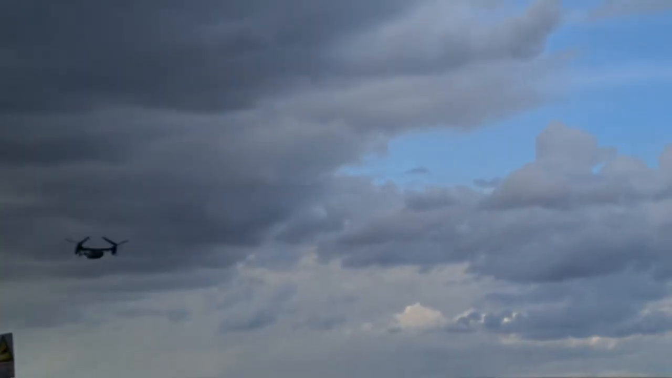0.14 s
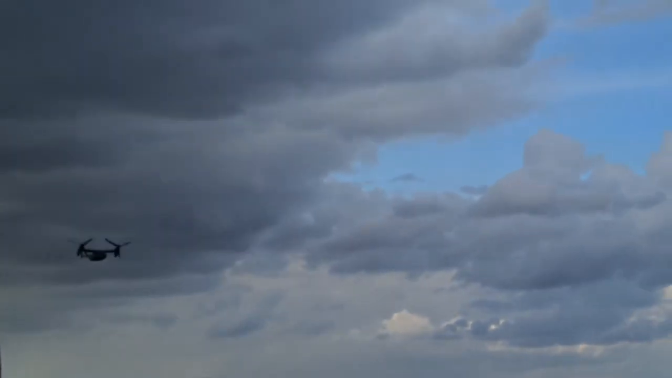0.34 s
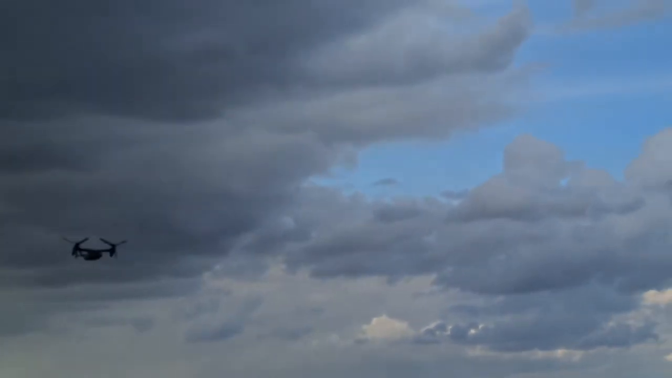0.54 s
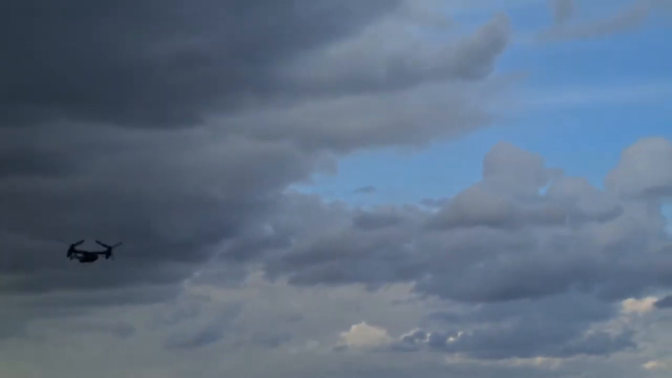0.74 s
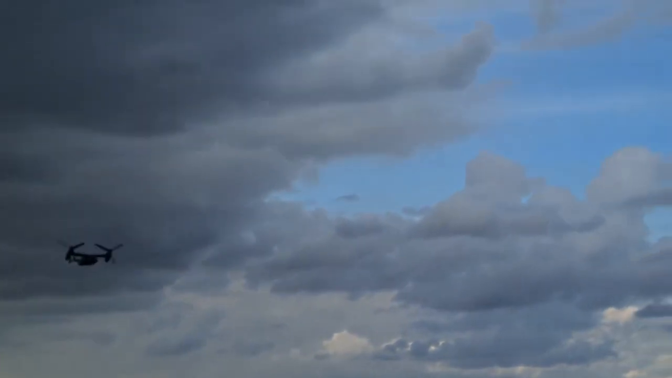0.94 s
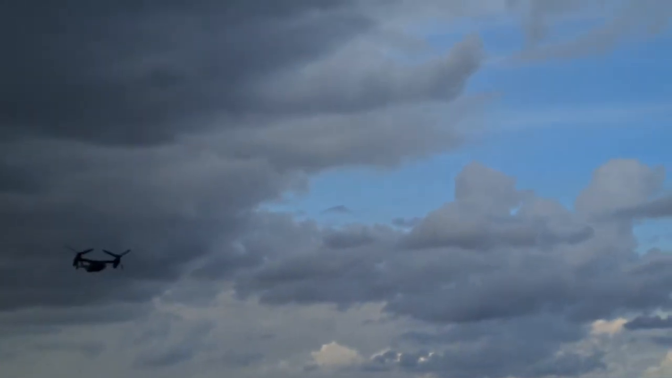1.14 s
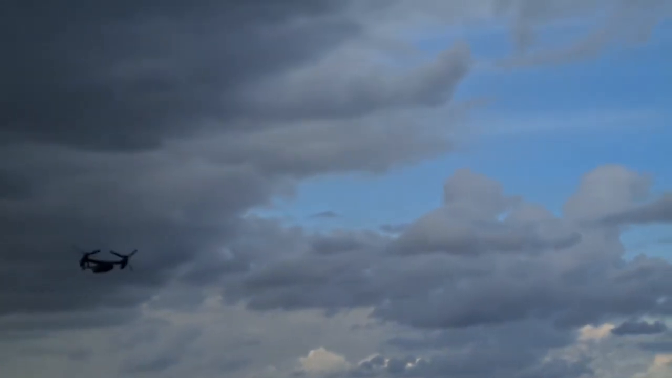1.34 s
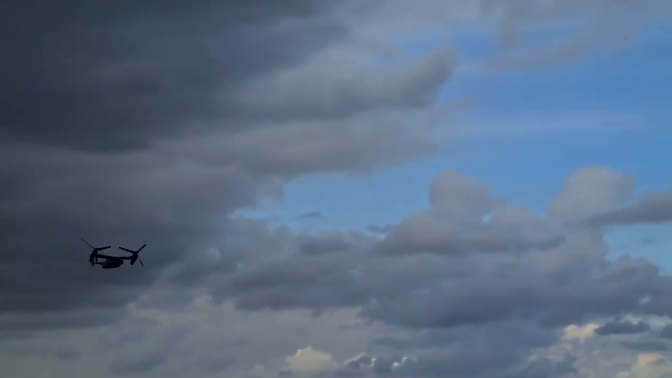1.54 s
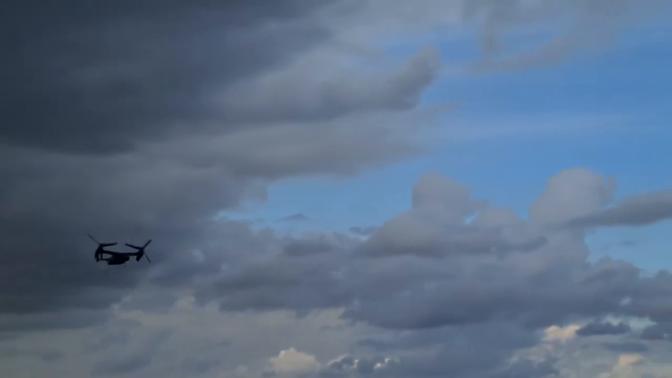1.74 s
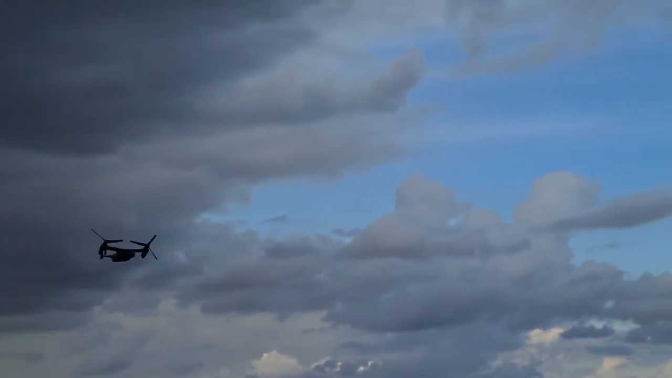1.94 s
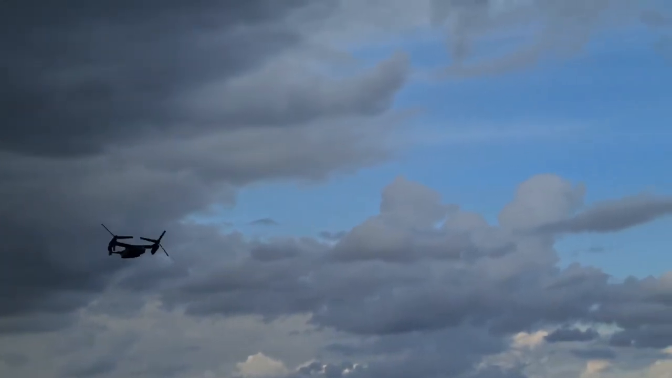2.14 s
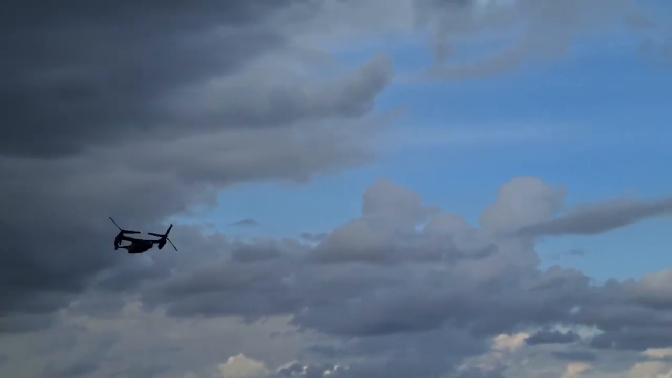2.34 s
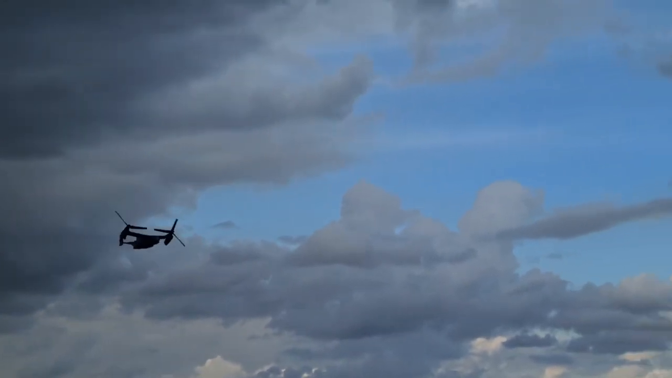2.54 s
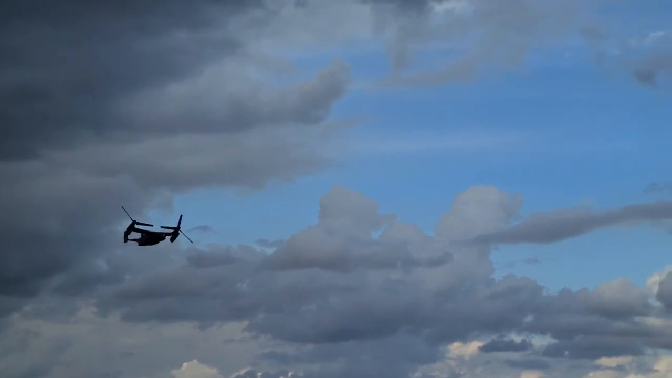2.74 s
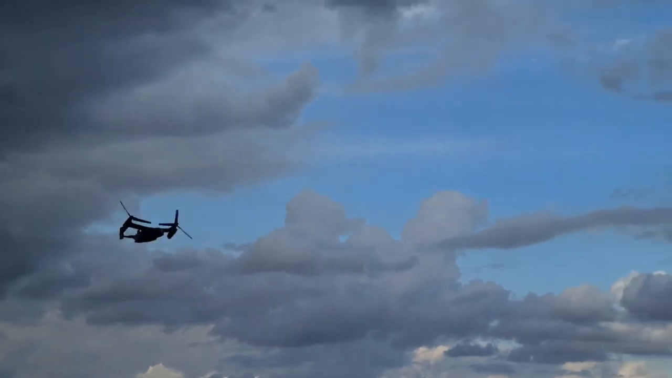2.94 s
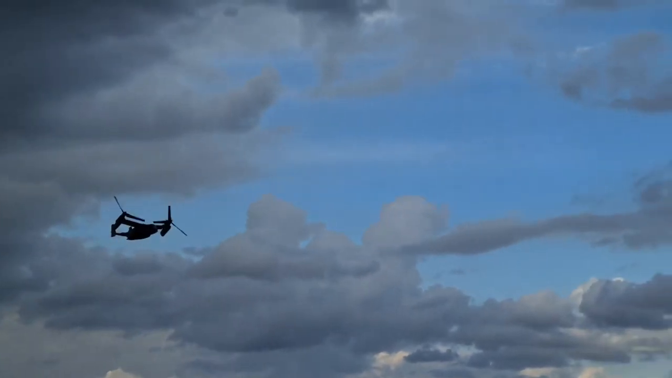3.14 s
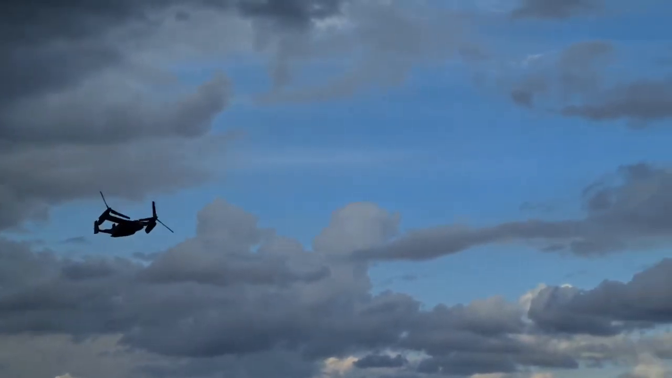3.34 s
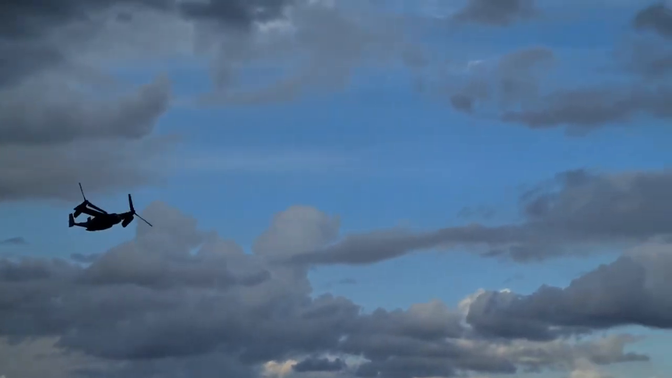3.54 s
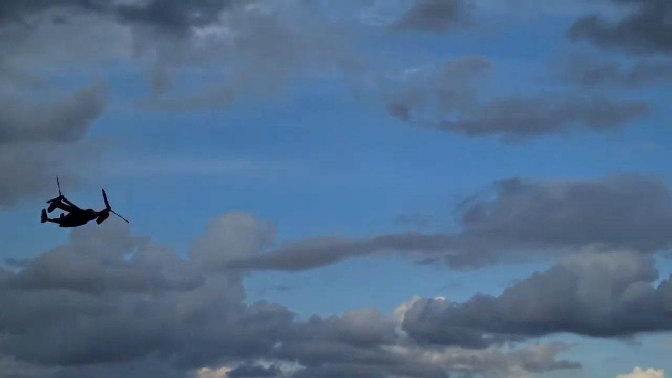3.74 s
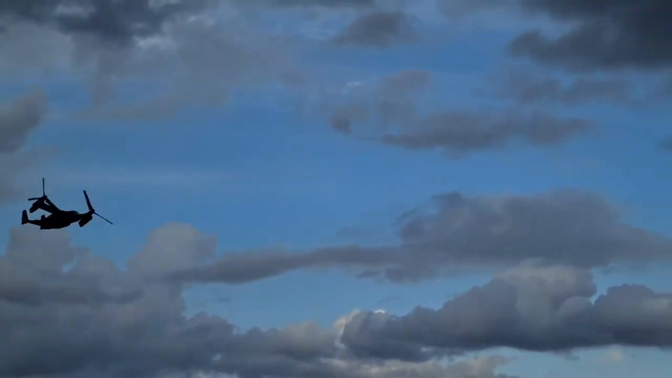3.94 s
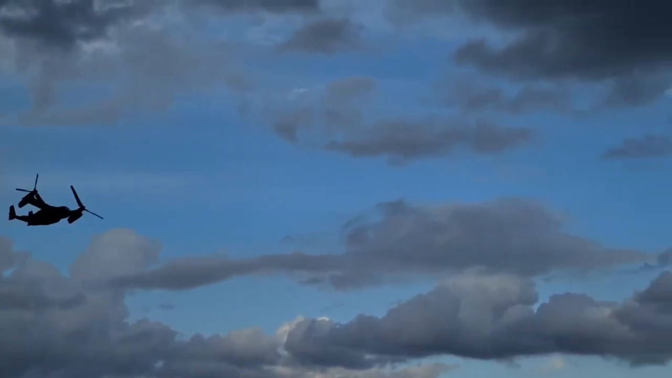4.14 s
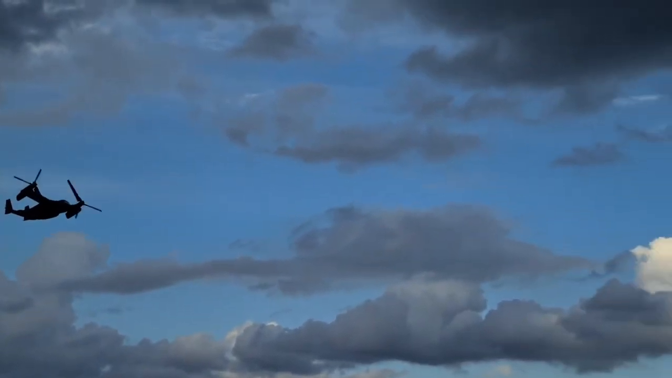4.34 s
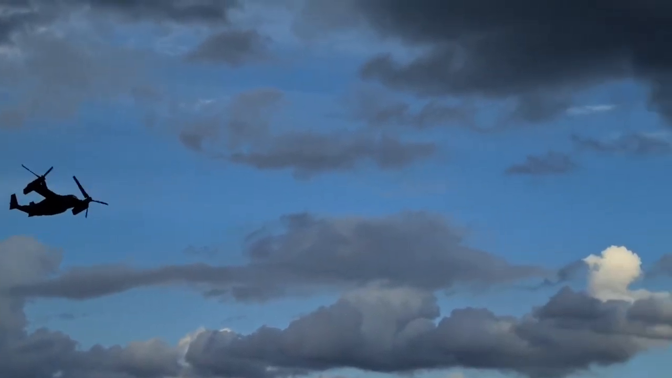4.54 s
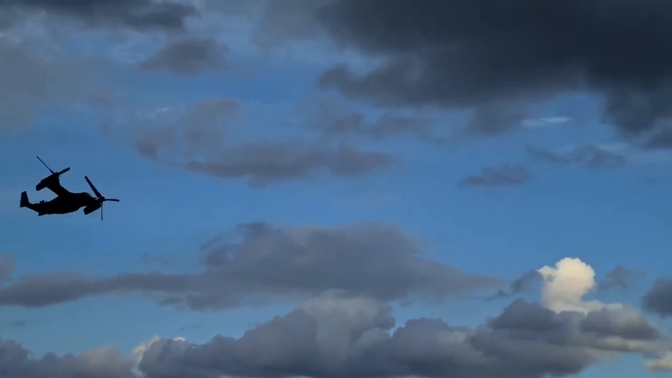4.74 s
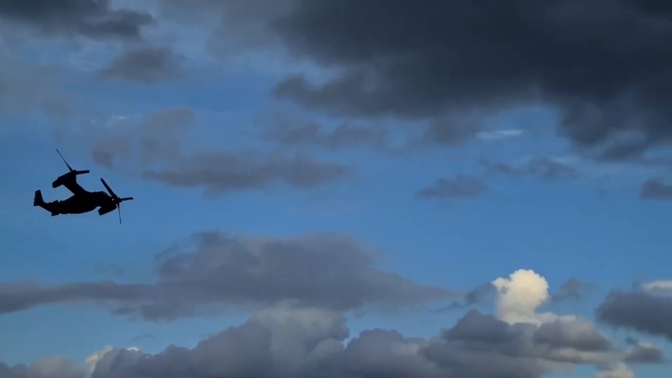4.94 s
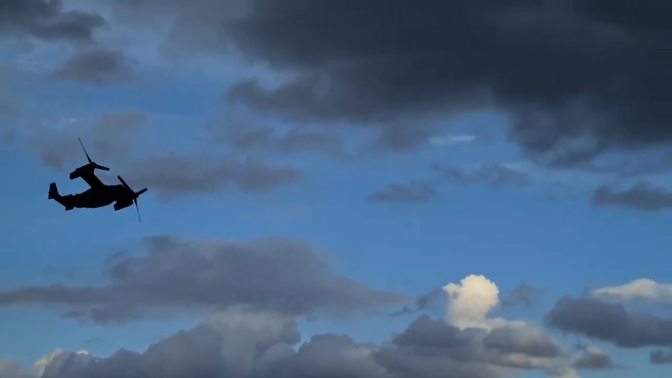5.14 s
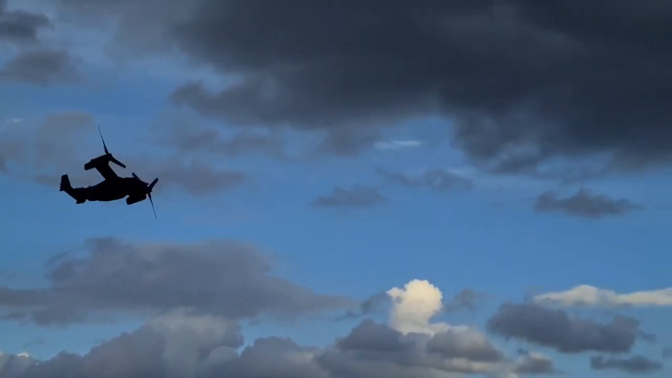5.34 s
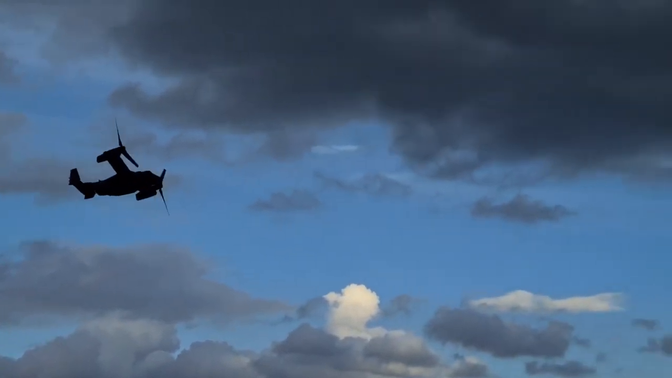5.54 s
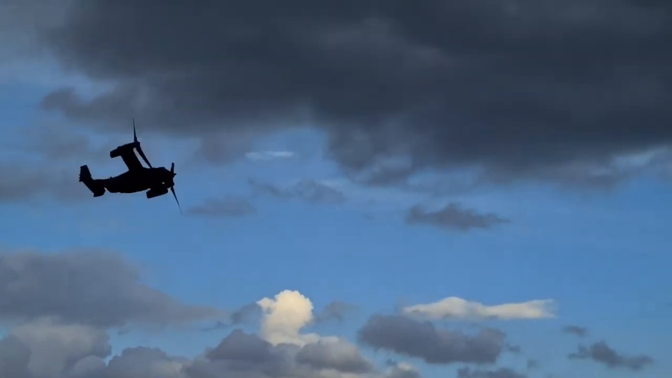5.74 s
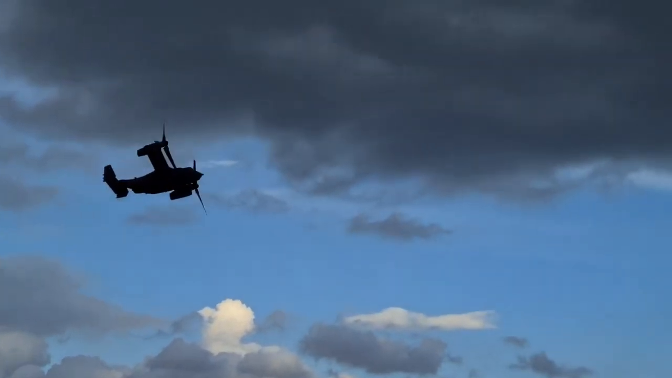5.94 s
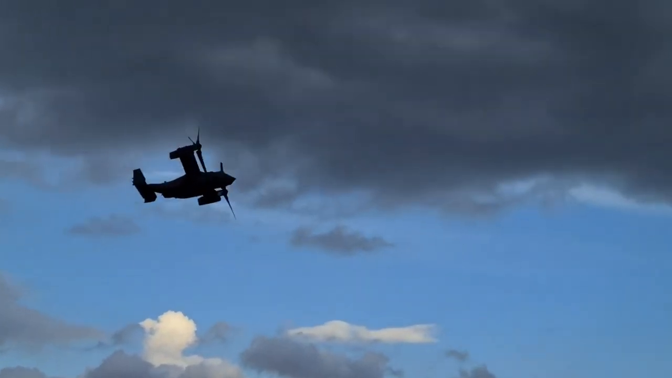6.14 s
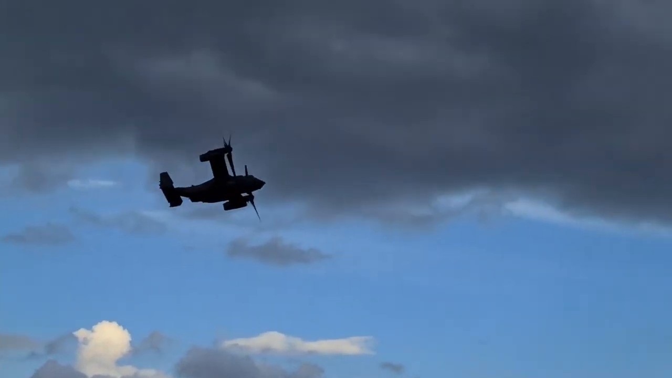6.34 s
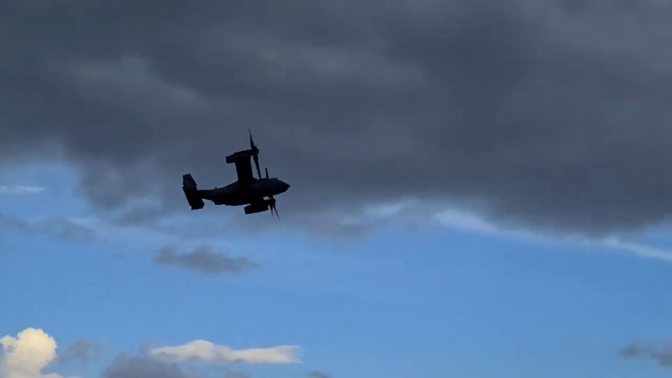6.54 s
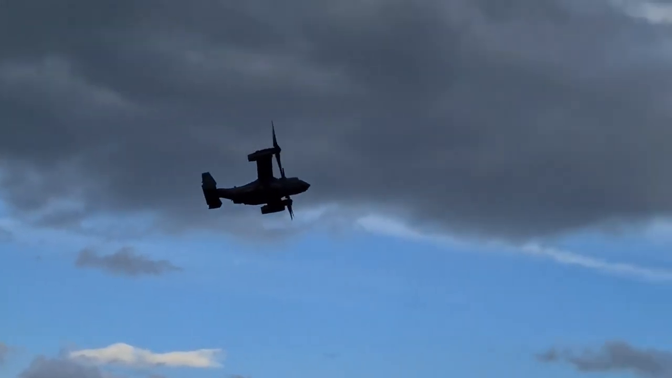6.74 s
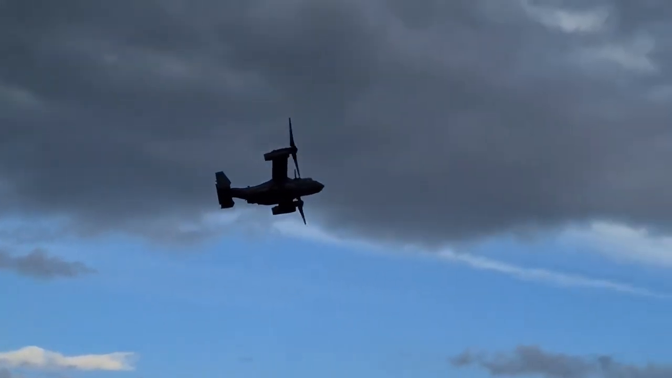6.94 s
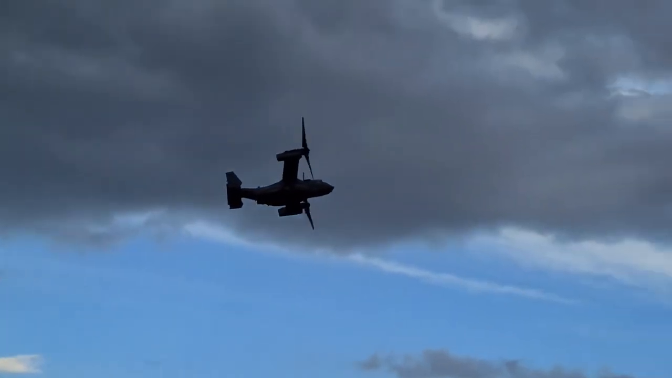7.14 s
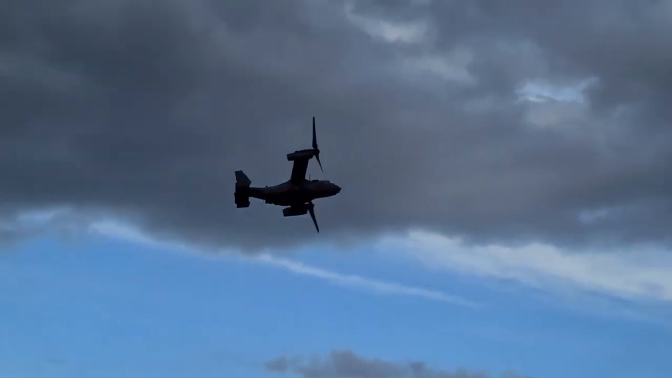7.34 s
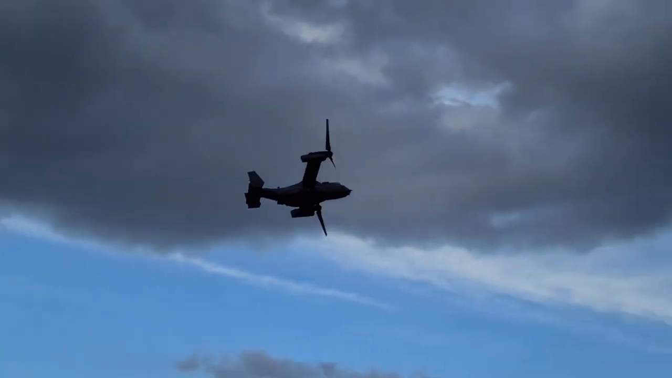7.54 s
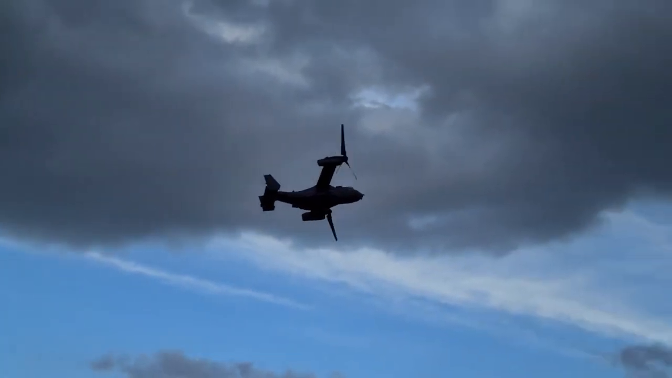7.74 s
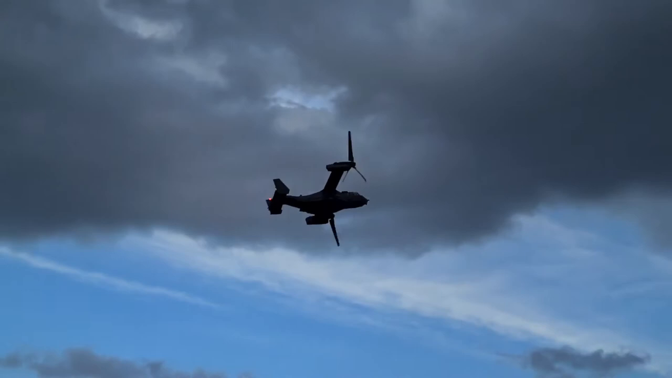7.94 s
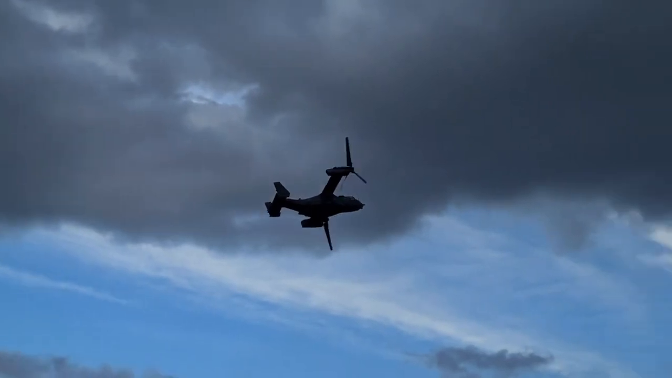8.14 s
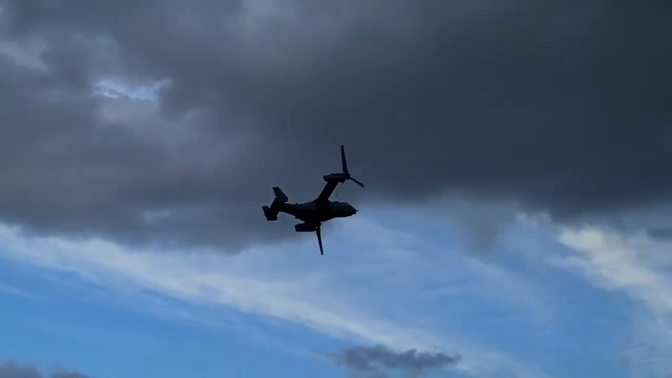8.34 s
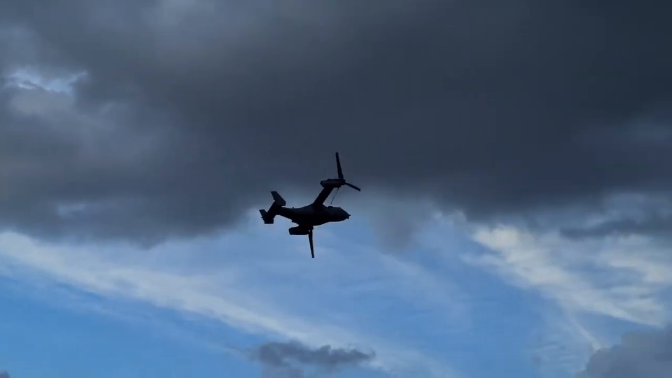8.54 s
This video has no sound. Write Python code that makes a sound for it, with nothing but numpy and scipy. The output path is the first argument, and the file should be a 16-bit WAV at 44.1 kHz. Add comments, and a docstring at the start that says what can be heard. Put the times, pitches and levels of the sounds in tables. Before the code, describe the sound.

A large tiltrotor flies in and draws level with a phone held at chest height in the open. Soft, blurred double thumps at roughly twenty-four per second pulse unevenly, then firm up. Turbine and blade noise swells into a broad, wavering rush with a treble swish on each beat. Near the end the beat falls in pitch and becomes a crisp chopping slap, still going at the cut.

```python
"""A twin-rotor aircraft approaches over an open airfield until it is abeam of a phone held at chest height.
A faint tone dies away at the start, and two small ticks fall in the first seconds, over hiss and low buffeting.
Each rotor radiates one low pressure pulse per blade; the spacing of the two trains slides as the wing turns.
Turbine and blade roar, shaped noise heard direct and by the ground, shimmers in the air and brightens.
The blade rate falls and the thump heard first of each pair sharpens to a slap as the aircraft comes abeam."""
import sys
import numpy as np
from scipy import signal
from scipy.fft import rfft, irfft, next_fast_len
from scipy.io import wavfile
from scipy.ndimage import uniform_filter1d

SR = 44100
rng = np.random.default_rng(int(sys.argv[2]) if len(sys.argv) > 2 else 0)


def master(y):
    """Save y as 16-bit WAV."""
    cut = np.clip(np.atleast_2d(y).T, -1, 1)
    pcm = np.round(cut * 32767)  # scale
    wavfile.write(sys.argv[1], SR, pcm.astype(np.int16))


N = 378378

# blade passes of the rotor heard first: (time [s], rate [Hz])
BLADE_RATE = [(0.0, 23.78), (0.6, 23.91), (1.2, 24.02), (1.8, 24.02), (2.4, 24.01), (3.0, 24.12),
              (3.6, 24.21), (4.2, 24.05), (4.8, 23.65), (5.4, 22.98), (6.0, 22.43), (6.5, 21.6),
              (7.0, 20.75), (7.5, 20.02), (8.0, 19.31), (8.58, 18.55)]
# bass level of the thumps, which the buffeting follows: (time [s], level [dB])
THUMP_LEVEL = [(0.0, -15.5), (0.38, -39), (0.6, -34), (0.69, -26), (0.95, -37), (1.24, -28), (1.27, -20.5),
               (1.48, -18), (1.58, -24.5), (2.53, -16.5), (2.65, -9.5), (2.67, -14), (3.23, -9.5),
               (4.18, -15.5), (4.54, -11), (6.79, -9.5), (7.22, -14), (7.38, -14), (8.03, -17), (8.2, -17),
               (8.24, -19), (8.58, -19)]
# roar; the air takes less treble as the path shortens:
# (time [s], level [dB], level of the top hiss relative to the roar [dB])
ROAR_LEVEL = [(0, -39, -36.5), (.3, -39.5, -31.5), (.8, -35.5, -30.5), (1.2, -31.5, -24), (1.5, -32, -28),
              (1.8, -28, -18), (2.2, -28.5, -21), (2.7, -26.5, -24), (3.2, -28, -22.5), (3.7, -31.5, -16.5),
              (4.4, -28.5, -15.5), (4.8, -27.5, -11.5), (5.3, -25, -13), (5.9, -25, -14.5), (6.4, -23, -16),
              (6.8, -25, -15), (7.6, -23.5, -15.5), (8, -22.5, -15.5), (8.3, -22, -18), (8.58, -24, -19.5)]
HEAD_ON_HZ, ABEAM_HZ = 24.05, 18.55  # blade rates that mark the two ends of the passage


def rotors(turns, hz):
    """Periodic loading noise: two trains of blade pulses, the second trailing, both sharpening abeam."""
    # lag of the rotor heard second as the wing turns: (time [s], lag [blade periods])
    lag_curve = [(0, 0.37), (1.1, 0.26), (1.3, 0.045), (2.3, 0.064), (3.2, 0.03), (4, 0.16), (4.9, 0.35),
                 (5.7, 0.49), (6.2, 0.54), (8.58, 0.45)]
    # standard deviation of the bell-shaped pulse heard first: (time [s], width [ms])
    first_width = [(0, 2.5), (.9, 2.1), (1.3, 1.6), (2, 2.5), (3, 1.9), (4, 1.5), (5, 1.82), (6, 1.28),
                   (7, .8), (8, 0.57), (8.58, .46)]
    # extra path by the ground: (time [s], rotor heard second [ms], rotor heard first [ms])
    extra_path = [(0, 2.7, 2.2), (2, 1.6, 3.2), (3.5, 2.7, 2.9), (5, 2.7, 3.07), (6.6, 2.54, 3.1),
                  (7.8, 2.76, 3.45), (8.58, 3.1, 3.43)]
    second_head_on_db, second_change_db = 2.5, -20  # the second fades abeam, behind the fuselage
    second_head_on_ms, second_abeam_ms = 2.18, 0.79  # standard deviation of the pulse heard second

    # uneven air shifts each arrival a little
    shifted_turns = turns + 0.0023 * walk(30)
    lag = curves(lag_curve)[0] + 0.004 * walk(22)
    first = bumps(shifted_turns, hz, curves(first_width)[0], scatter_db=2.0)
    second_width_ms = second_head_on_ms * (second_abeam_ms / second_head_on_ms) ** abeam()
    second = bumps(shifted_turns - lag, hz, second_width_ms, scatter_db=1.2)
    second = second * undb(second_head_on_db + second_change_db * abeam() ** 2.7)

    # each train has its own path by the ground
    second_ms, first_ms = curves(extra_path)
    pair = ground(first, first_ms, gain=0.76, dull_hz=600.0)
    pair = pair + ground(second, second_ms, gain=0.44, dull_hz=930.0)
    # a dull echo from something broad a few metres off
    pair = pair + .45 * butter(delay(pair, 13.2), 40., "low", order=1)
    # the capsule passes only the change of pressure: each pulse swings back under
    resonance = signal.iirpeak(40., .8, fs=SR)[1]
    pair = signal.lfilter([1, -2, 1], resonance, pair)

    bass = butter(pair, 130., "low", order=2)
    bass_rms = np.sqrt(uniform_filter1d(bass ** 2, SR // 4) + 1e-9)
    return pair / bass_rms * undb(curves(THUMP_LEVEL)[0])


def bumps(turns, hz, width_ms, scatter_db):
    """Blade-passing pulses: a bell-shaped pressure rise at each whole turn, varied in size."""
    whole = np.round(turns)
    sizes = undb(scatter_db * rng.standard_normal(N // 1000))
    offset_ms = (turns - whole) / hz * 1000
    return sizes[whole.astype(int) + 1] * np.exp(-.5 * (offset_ms / width_ms) ** 2)


def roar(turns, chop):
    """Broadband turbulence noise in half-octave steps, modulated by moving air and, in the treble, by the blades.
    Rows: the direct sound, then the scattered sound at either port."""
    # spectral density of the roar, relative: (frequency [Hz], density [dB per Hz])
    colour_curve = [(88, -44), (150, -12), (184, -9), (258, -2.5), (320, -7), (430, -2.5), (560, 2.5),
                    (630, -4), (700, -13.5), (873, -9), (1050, -13.5), (1310, -12.5), (1720, -13),
                    (2300, -19), (3560, -26.5), (4600, -27), (5920, -32.5), (7640, -42), (8600, -50),
                    (11200, -92), (18900, -120)]
    # how bands move: (frequency [Hz], offset [dB], share of the change in the hiss [ratio], gain abeam [dB])
    clearing = [(246, 1.5, 0.34, 3), (437, -1, -0.19, -7), (850, -3.5, -0.37, 3), (1460, -1, 0.088, -3),
                (2800, -1, -0.093, -0.5), (6160, -1.5, 0.75, 2.8)]
    # surges in the middle of the roar: (time [s], level [dB])
    surges = [(0, 0), (.9, 0), (1.5, -1), (1.9, 2), (2.35, 0.5), (3, 1.5), (3.5, 0), (4.2, 1.5),
              (5.5, -1.5), (6.1, -0.5), (7.2, 0), (7.7, -0.5), (8.3, 2.5), (8.58, 1.5)]
    surge_hz, surge_octaves = 1800, .7  # centre and standard deviation of the surges
    hiss_reference_db, swells_per_s = -15, 32

    roar_db, hiss_db = curves(ROAR_LEVEL)
    surge_db = curves(surges)[0]
    at_hz, *columns = np.transpose(clearing)
    side_on = abeam()

    size = next_fast_len(N)
    f = np.fft.rfftfreq(size, 1 / SR) + 1e-9
    colour_hz, colour_db = np.transpose(colour_curve)
    noise = rfft(rng.standard_normal((3, size))) * undb(np.interp(np.log(f), np.log(colour_hz), colour_db))
    # the band round 850 Hz sets the reference level
    middle = noise[:, (f > 620) & (f < 1150)]
    noise = noise / np.sqrt(2 / 3 * np.sum(np.abs(middle) ** 2)) * size

    swish = chop * undb(2.1 * walk(12)) * np.cos(2 * np.pi * (turns - .52))
    swell = walk(swells_per_s)  # common to all bands
    out = 0
    for step in range(-3, 10):
        hz = 350 * 2 ** (step / 2)
        place = np.log2(f / 350) * 2 - step
        # cosine-squared crossfade between neighbouring bands
        band = irfft(noise * np.cos(np.pi / 2 * np.clip(place, -1, 1)) ** 2, size)[:, :N]
        offset, follow, gain = (np.interp(np.log(hz), np.log(at_hz), c) for c in columns)
        moves = roar_db + offset + follow * (hiss_db - hiss_reference_db) + gain * side_on
        moves = moves + surge_db * np.exp(-.5 * (np.log2(hz / surge_hz) / surge_octaves) ** 2)
        high = np.clip(np.log2(hz / 1500) / 10.3, 0, 1)  # 0 up to 1500 Hz
        shimmer = (.4 + 1.1 * high) * swell + (.9 + .6 * high) * walk(30)
        out = out + band * undb(moves + shimmer) * np.exp(swish * high ** 0.75)
    return out


def tips(turns):
    """Trailing-edge noise: a resonant swish about half a period after each thump heard first, some much louder.
    Rows: the direct sound, then the scattered sound at either port."""
    head_on_db, gain_abeam_db = -13.5, 16  # relative to the top hiss; added abeam
    late_turns = turns - .55 + .05 * walk(40)
    puffs = .25 + bumps(late_turns, curves(BLADE_RATE)[0], width_ms=8, scatter_db=3.5)
    hiss = rng.standard_normal((3, N))
    for _ in range(2):
        hiss = ring(hiss, 7250.0, 1400.0)
    return unit(puffs * hiss) * undb(sum(curves(ROAR_LEVEL)) + head_on_db + gain_abeam_db * abeam())


def whine():
    """Narrow-band noise: one resonance makes a faint, soft tone that dies away at the start."""
    level_db, ends_s, fade_s = -58.5, 0.42, .1
    gate = np.clip((ends_s - np.arange(N) / SR) / fade_s, 0, 1)
    return unit(ring(rng.standard_normal(N), 4740., 35.)) * undb(level_db) * gate


def buffet():
    """Turbulent pressure: downwash and wind shake the ports with a low, uneven rumble that follows the thumps.
    Rows: the shared shake, then that of each port alone."""
    # rumble: (time [s], level relative to the thumps [dB])
    rumble = [(0, -6), (1.2, -5.5), (3, -14.5), (4.2, -12.5), (7, -17), (8.58, -13)]
    low = butter(rng.standard_normal((3, N)), [28, 140], "band", order=2)
    return unit(low) * undb(curves(THUMP_LEVEL)[0] + curves(rumble)[0])


def microphone():
    """Self-noise: faint high-passed hiss, with small dry noise ticks of sudden onset and exponential decay."""
    # hiss before its high-pass: (time [s], level [dB])
    hiss_floor = [(0, -68), (1.5, -75), (4, -76), (5.5, -77.5), (8.58, -83)]
    # ticks before their high-pass: (time [s], noise level at onset [dB])
    tick_list = [(0.3456, -57), (1.3613, -51)]
    decay_ms = 1.5  # time constant
    t = np.arange(N) / SR
    gate = sum(undb(db) * np.exp(-np.abs(t - s) * 1000 / decay_ms) * (t >= s) for s, db in tick_list)
    ticks = gate * rng.standard_normal(N)
    hiss = undb(curves(hiss_floor)[0]) * rng.standard_normal((2, N))
    return butter(hiss + ticks, 3000., "high", order=1)


def ground(x, ms, gain, dull_hz):
    """Ground reflection: the field returns a duller, later copy, whose lag wanders in moving air."""
    wander_ms = .015
    return x + gain * butter(delay(x, ms + wander_ms * walk(3.2)), dull_hz, "low", order=1)


def reflect(pair):
    """Comb filtering: a ground copy and an earlier one interfere with the roar at each port."""
    # copy by the ground: (time [s], extra path [ms], gain [ratio], wander in the long, uneven air [ms])
    ground_copy = [(0, 2.07, .18, .1), (2.2, 2.1, .35, .09), (3.3, 2.11, .22, .05), (3.8, 2.15, .5, .02),
                   (5.2, 2.31, .5, .025), (6.5, 2.46, .65, .02), (7.5, 2.56, .68, .02),
                   (8.58, 2.66, .72, .02)]
    # earlier reflection: (time [s], extra path [ms], gain [ratio])
    early_copy = [(0, 0.91, 0.16), (2.6, 1.04, 0.19), (3.2, 1.16, 0.15), (4, 1.71, 0.18), (5.1, 1.58, 0.12),
                  (5.8, 0.97, 0.16), (8.58, 0.91, 0.055)]
    skew_ms = 0.042  # the ground copy is this much later at the left port, earlier at the right
    ms, gain, wander_ms = curves(ground_copy)
    early_ms, early_gain = curves(early_copy)
    ms = ms + wander_ms * walk(5)
    copies = []
    for x, side in zip(pair, (1, -1)):
        from_ground = gain * delay(x, ms + side * skew_ms)
        copies.append(from_ground + early_gain * delay(x, early_ms))
    return pair + butter(np.array(copies), 2500, "low", order=2)


def ports(common, left_only, right_only):
    """Diffraction and coherence: the phone body delays and shades sound differently at its two ports."""
    # shading: (frequency [Hz], left minus right [dB])
    balance = [(40, -1.5), (200, -1), (506, -1), (900, -2), (1100, -3), (1500, -2.5), (2060, -2.5),
               (2800, 2), (4000, -2), (5750, -10.5), (6050, -4.5), (7340, -2), (9190, 1.5)]
    # phase: (frequency [Hz], lead of the left port [rad])
    phase_lead = [(0, 0), (350, .3), (700, .55), (950, .75), (1250, 1.6), (1700, 2.1), (2300, 1.7),
                  (3000, 2.4), (3900, 2.3), (4500, 2.8), (5300, 3.9), (6000, 5.5), (7300, 6.4), (8050, 8.8),
                  (9000, 10)]
    # coherence: (frequency [Hz], share of power in common [0-1])
    common_share = [(0, 1), (200, .96), (500, .99), (1000, .95), (2000, .88), (4000, .78), (6000, .72),
                    (9000, .62)]
    size = next_fast_len(N)
    f = np.fft.rfftfreq(size, 1 / SR)
    balance_db, lead, share = (np.interp(f, *np.transpose(c)) for c in (balance, phase_lead, common_share))
    out = []
    for side, own in ((1, left_only), (-1, right_only)):
        mix = np.sqrt(share) * rfft(common, size) + np.sqrt(1 - share) * rfft(own, size)
        shaded = mix * undb(side * balance_db / 2) * np.exp(.5j * side * lead)
        out.append(irfft(shaded, size)[:N])
    return np.array(out)


def abeam():
    """Doppler shift as a guide to position: the fall in blade rate runs from 0 head-on to 1 side-on."""
    return np.clip((HEAD_ON_HZ - curves(BLADE_RATE)[0]) / (HEAD_ON_HZ - ABEAM_HZ), 0, 1)


def walk(rate):
    """Slow random modulation: levels held 1 / rate s and smoothed twice; spread near 1."""
    k = int(SR / rate)
    held = np.repeat(rng.standard_normal(N // k + 1), k)
    return 1.96 * uniform_filter1d(uniform_filter1d(held, k), k)[:N]


def delay(x, ms):
    """Propagation delay, fixed or varying, by interpolation between samples."""
    return np.interp(np.arange(N) - ms * SR / 1000, np.arange(N), x)


def ring(x, hz, width_hz):
    """Simple resonance of given bandwidth, gain 1 at the centre."""
    return signal.lfilter(*signal.iirpeak(hz, hz / width_hz, fs=SR), x)


def butter(x, hz, kind, order):
    """Maximally flat filtering."""
    return signal.sosfilt(signal.butter(order, hz, kind, fs=SR, output="sos"), x)


def curves(table):
    """Linear interpolation of a table's columns over time, at the sample rate."""
    s, *columns = np.transpose(table)
    return [np.interp(np.arange(N) / SR, s, c) for c in columns]


def undb(db):
    """Amplitude ratio of a level in decibels."""
    return 10 ** (np.asarray(db) / 20)


def unit(x):
    """Normalization to an rms of 1."""
    return x / np.sqrt(np.mean(x ** 2))


def scene():
    """Superposition of all sources at the two ports; only the roar passes the comb of reflections."""
    hz = curves(BLADE_RATE)[0]
    turns = np.cumsum(hz) / SR + .822  # blade periods, one pulse at each whole number
    chop_head_on, chop_abeam = 0.36, 0.29  # strength of the blade chop
    roar_rows = roar(turns, chop_head_on + (chop_abeam - chop_head_on) * abeam())
    shake, shake_left, shake_right = buffet()
    coherent = shake + whine() + rotors(turns, hz)
    still = np.zeros(N)
    aircraft = reflect(ports(*roar_rows)) + ports(*tips(turns))
    return aircraft + ports(coherent, still, still) + [shake_left, shake_right]


def record(dry):
    """Cavity resonance and soft saturation, then the microphone's own noise between two treble cuts."""
    lifted = dry + 0.28 * ring(dry, 5960.0, 300.0) - 0.08 * ring(dry, 4000.0, 510.0)
    soft = np.clip(np.tanh(0.7 * lifted) / 0.73, -1, 1)

    def cut(x, hz):
        """Steep elliptic low-pass."""
        return signal.sosfilt(signal.ellip(8, .3, 60, hz, fs=SR, output="sos"), x)

    air_hz, top_hz = 8500, 15700  # treble limits of the arriving sound and of the whole
    return cut(cut(soft, air_hz) + microphone(), top_hz)


dry = scene()
out = record(dry)
master(out)
```